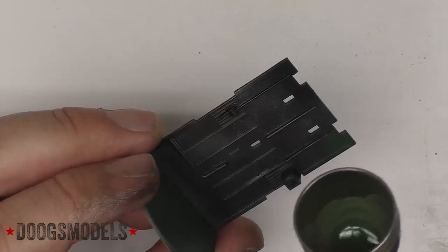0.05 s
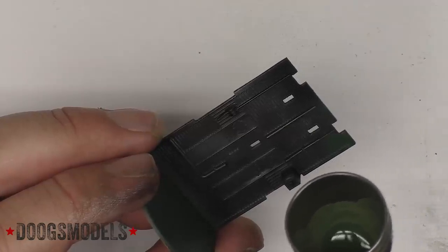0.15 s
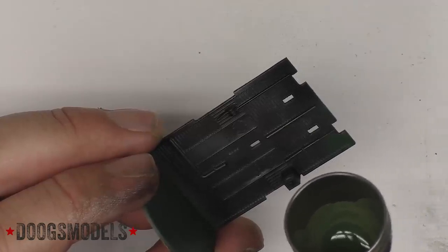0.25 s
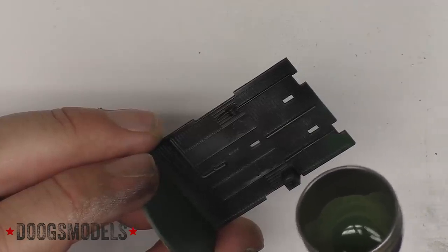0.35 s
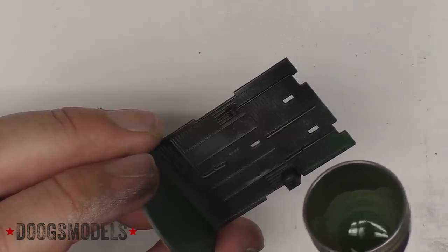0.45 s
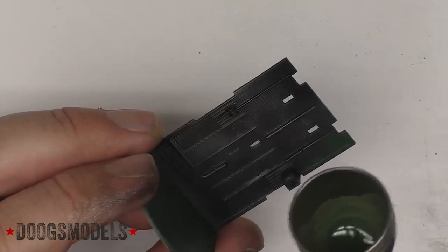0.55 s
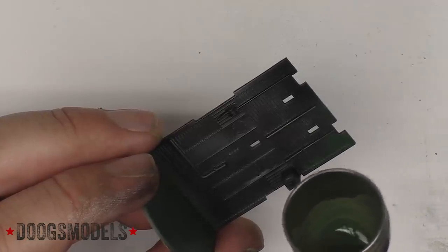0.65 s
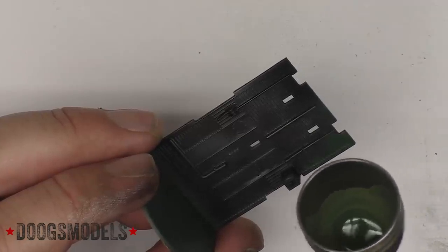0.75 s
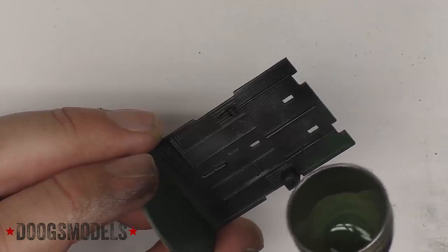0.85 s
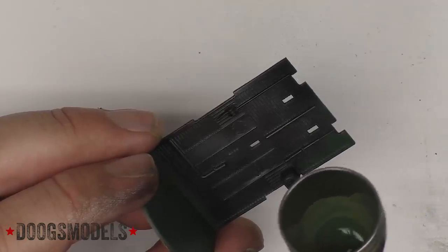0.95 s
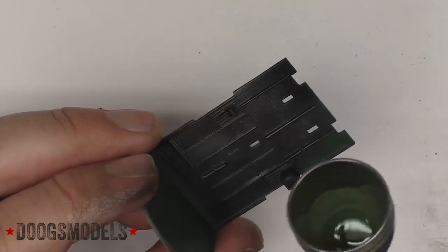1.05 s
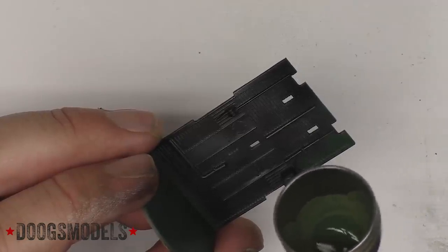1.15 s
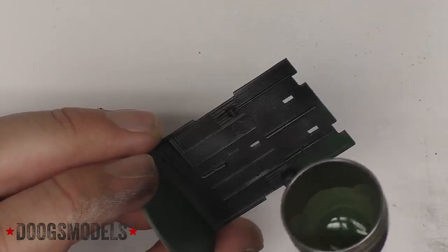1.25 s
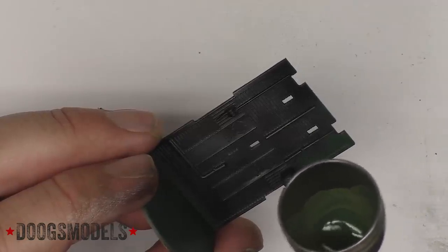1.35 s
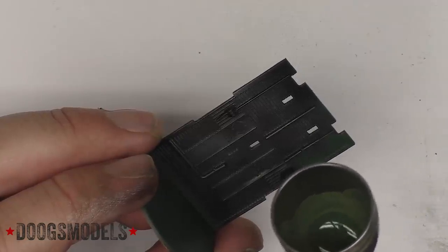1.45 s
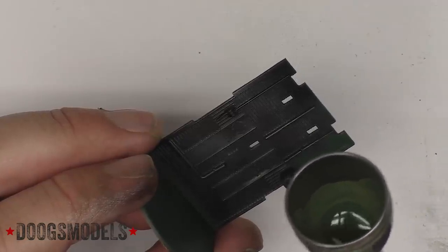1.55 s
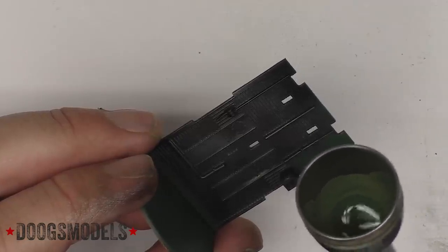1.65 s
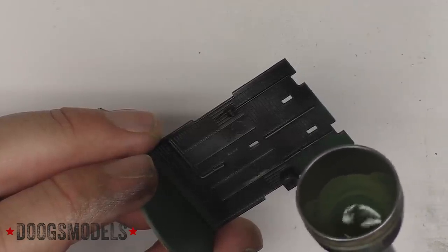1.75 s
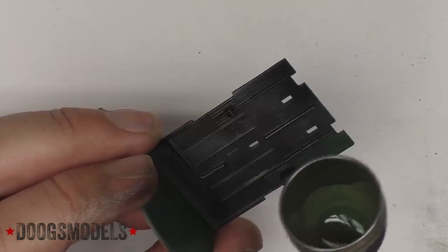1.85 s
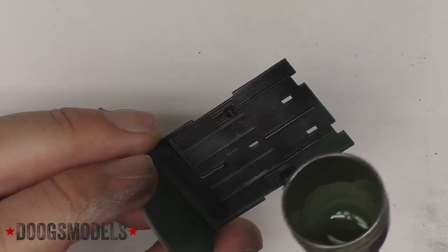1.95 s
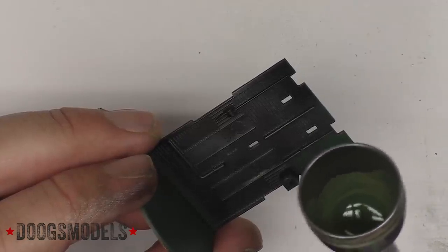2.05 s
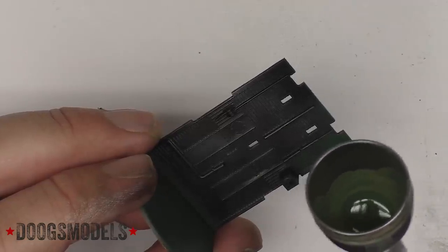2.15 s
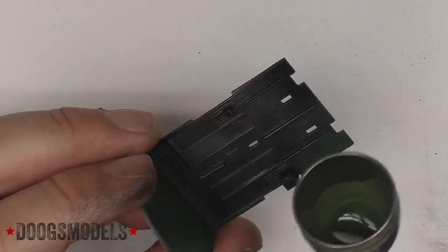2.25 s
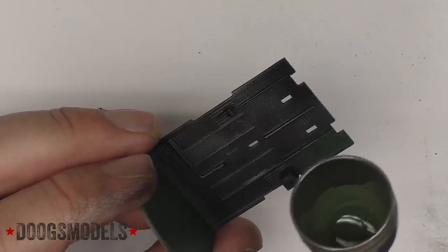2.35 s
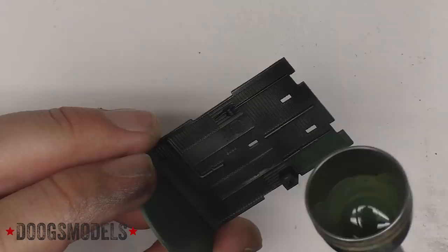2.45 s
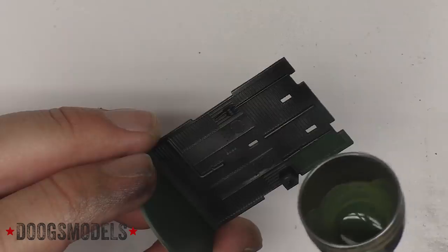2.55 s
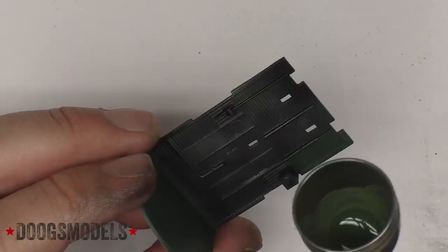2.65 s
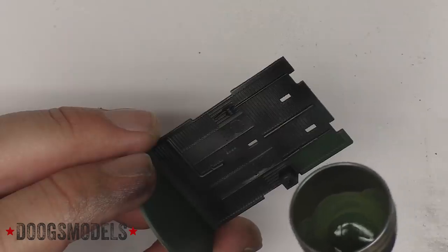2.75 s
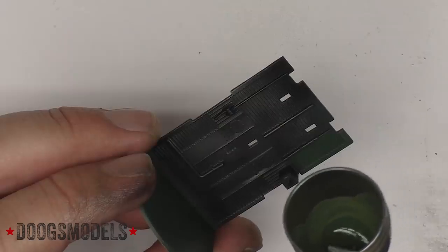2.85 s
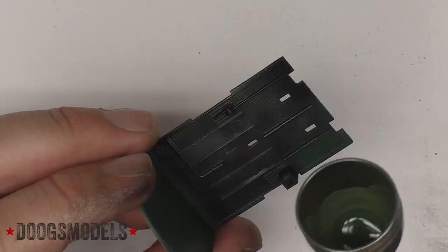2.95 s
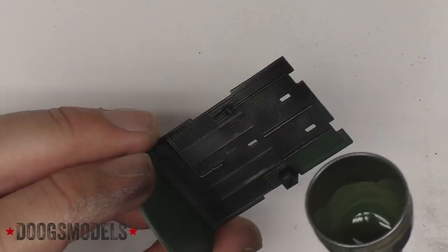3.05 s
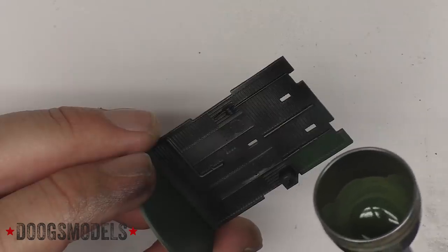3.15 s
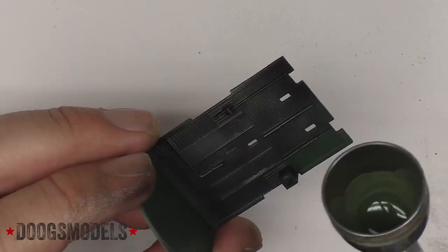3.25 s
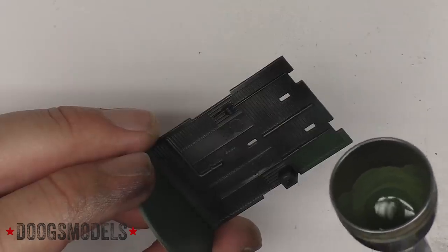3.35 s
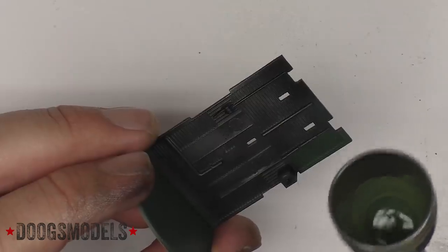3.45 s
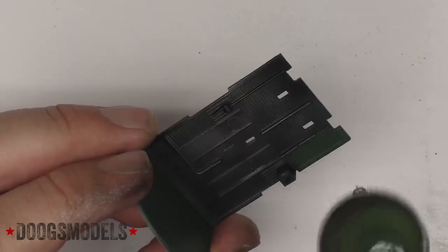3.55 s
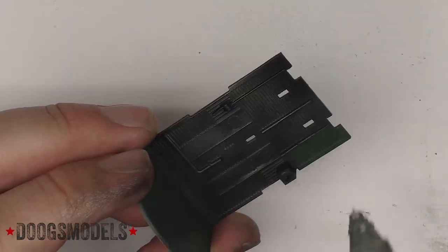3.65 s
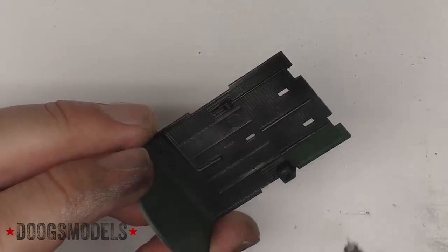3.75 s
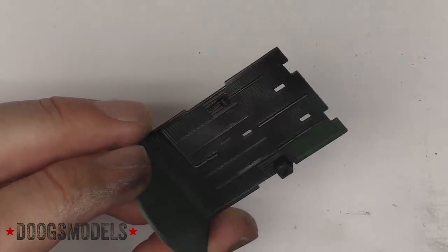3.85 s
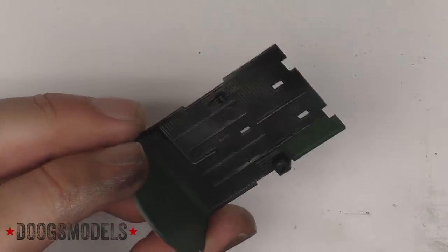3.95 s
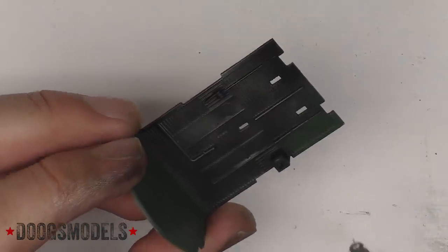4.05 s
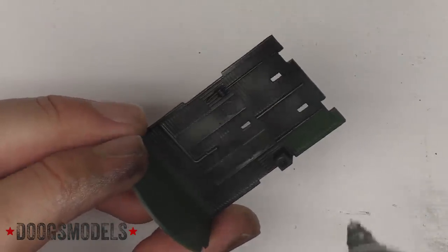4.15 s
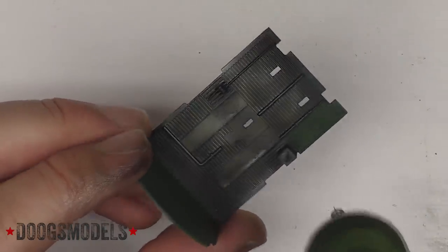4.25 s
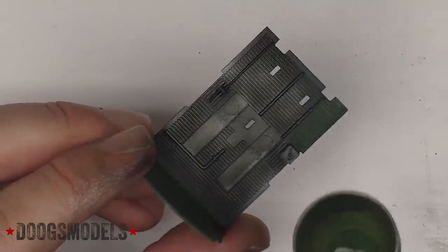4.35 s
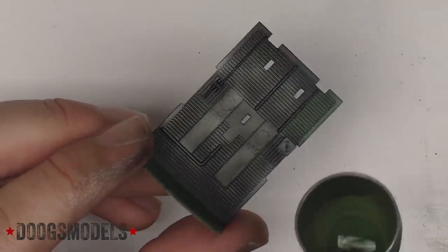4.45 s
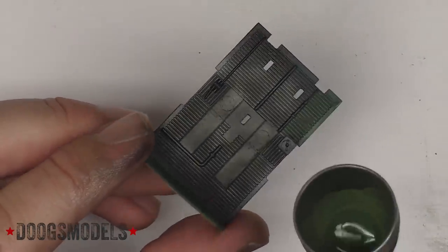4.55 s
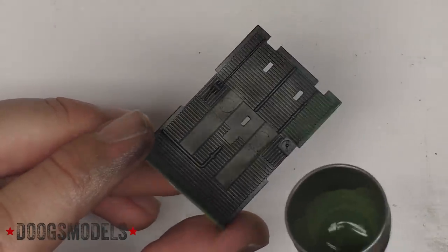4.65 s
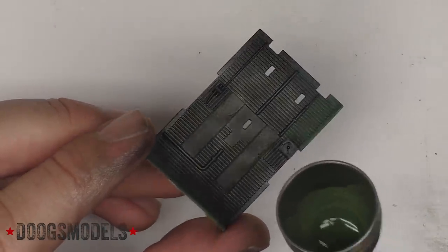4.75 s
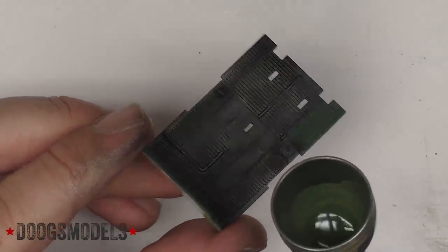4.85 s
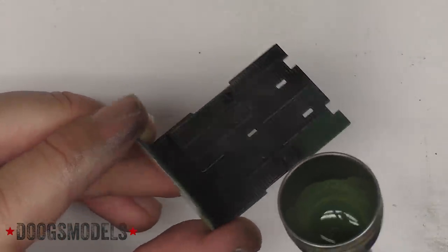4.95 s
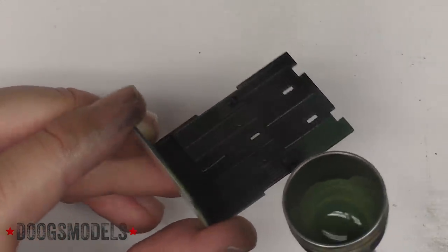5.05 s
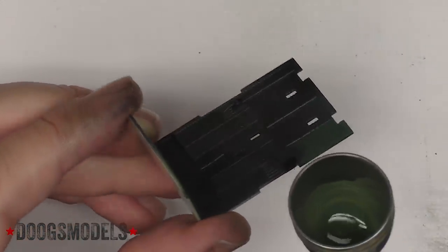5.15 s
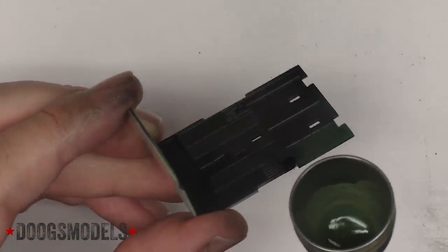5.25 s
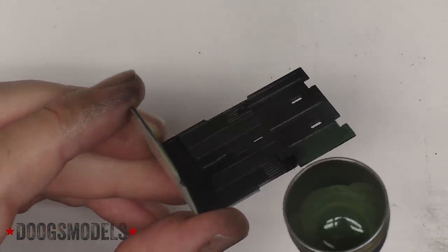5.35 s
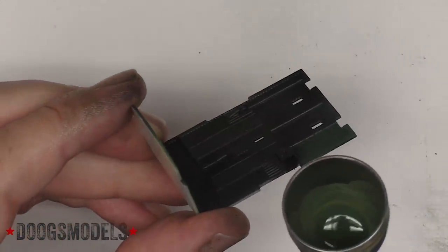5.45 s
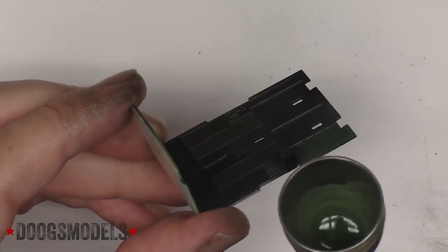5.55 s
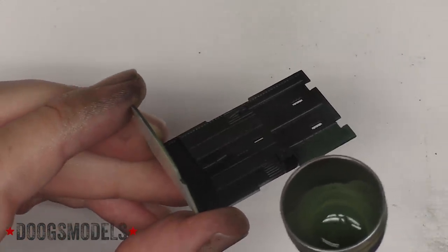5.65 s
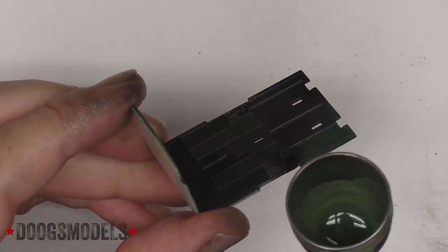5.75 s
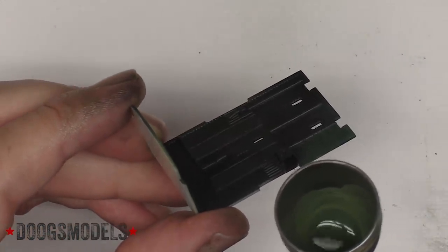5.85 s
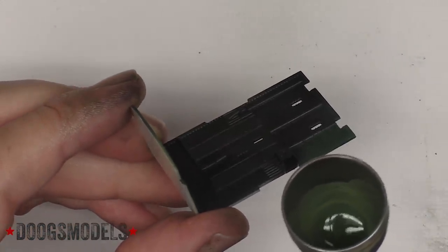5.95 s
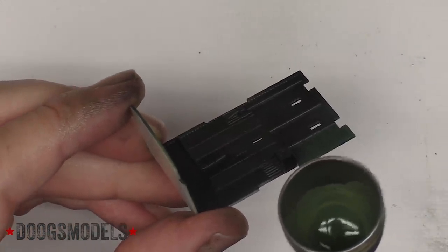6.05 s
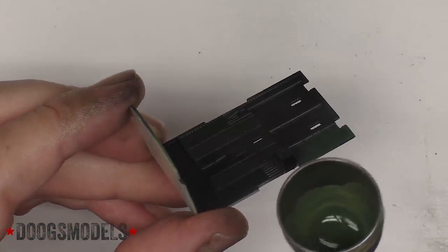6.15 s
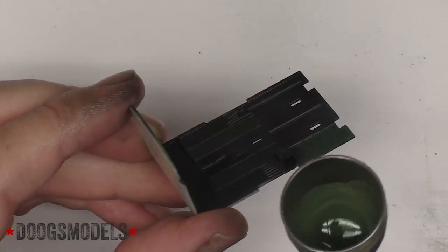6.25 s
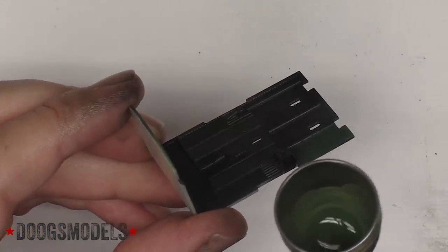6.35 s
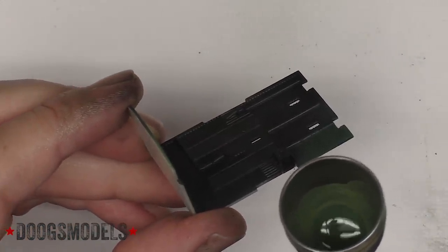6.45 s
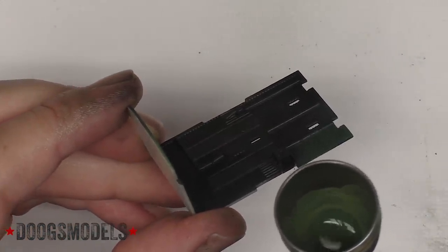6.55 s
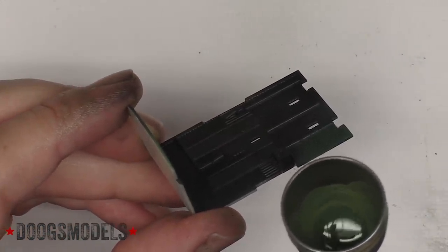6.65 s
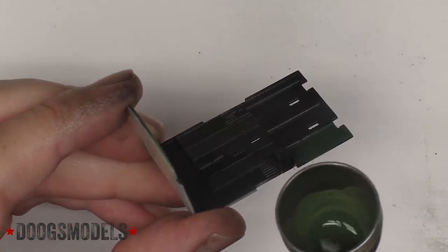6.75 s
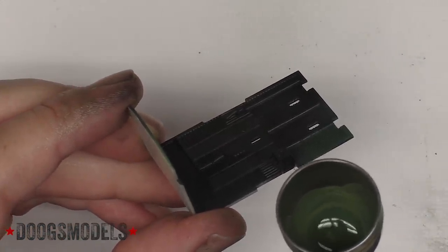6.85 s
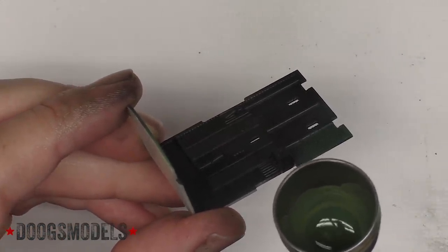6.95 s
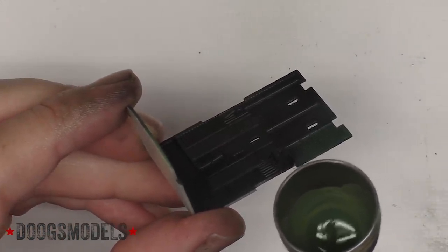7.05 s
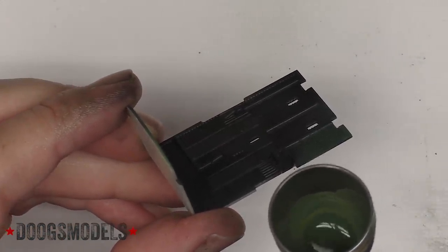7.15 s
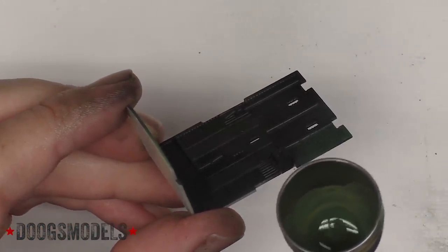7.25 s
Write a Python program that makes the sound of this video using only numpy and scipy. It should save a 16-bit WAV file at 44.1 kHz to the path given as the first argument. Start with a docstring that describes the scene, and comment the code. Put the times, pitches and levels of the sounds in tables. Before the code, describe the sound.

An airbrush hisses steadily, pauses while a small compressor faintly buzzes, gives one short puff, then sprays again.

```python
"""Airbrush on a small plastic part.

A long pass, a short test puff, then a pass on the tilted part. The jet fizzes at the nozzle, roars
where it lands and hisses on the edges; twice it spits paint. Faint squeaks and a whistle come from
the part. In the pause a small compressor buzzes over the low rumble and hum of the room."""
import sys
import numpy as np
from scipy import signal
from scipy.fft import rfft, irfft, next_fast_len
from scipy.io import wavfile
from scipy.ndimage import map_coordinates

SR = 44100
rng = np.random.default_rng(int(sys.argv[2]) if len(sys.argv) > 2 else 0)


def wav_out(sig):
    """Save sig, one row per channel (or a flat mono array), as 16-bit PCM at SR to the path in sys.argv[1]."""
    wavfile.write(sys.argv[1], SR, np.round(np.clip(np.atleast_2d(sig).T, -1, 1) * 32767).astype(np.int16))


N = 322371

# jet spectra (part flat, test puff, part tilted): f/Hz, relative level/dB
FLAT_SPECTRUM = [(400, -24), (600, -25.5), (800, -17.5), (1000, -9.5), (1400, -2), (2200, -0.5),
                 (2800, -13.5), (3500, -7.5), (4200, -10.5), (5400, -16), (7000, -13.5), (11000, -12),
                 (14000, -14), (15800, -21.5)]
TEST_SPECTRUM = [(400, -22.5), (600, -25), (800, -18), (1000, -7.5), (1400, -3.1), (2200, -0.5),
                 (2800, -3.5), (3500, -16.4), (4200, -4.5), (5400, -12.8), (7000, -15.5), (11000, -12.4),
                 (14000, -17), (15800, -20.4)]
TILTED_SPECTRUM = [(400, -35), (600, -26.9), (800, -26.6), (1000, -18.0), (1400, -5.8), (2200, -3.9),
                   (2800, -4.7), (3500, -8.9), (4200, 0.0), (5400, -5.7), (7000, -5.1), (11000, -4.1),
                   (14000, -7.4), (15800, -12.6)]
# peaks and notches of the hollows between part, fingers and paint cup: f/Hz, width/Hz, gain/dB
FLAT_HOLLOWS = [(1139, 61, -5.5), (1333, 42, -3.7), (1607, 91, -3.7), (2234, 30, -5.3), (2403, 58, 4.7),
                (2590, 30, -7.1), (2802, 62, 7.4), (3096, 35, 3.4), (3324, 30, -5.2), (3589, 62, -5.5),
                (3897, 98, 7.6), (4395, 337, 7.7), (4467, 54, -8.3), (4979, 40, 5.0), (5117, 40, -5.9),
                (5474, 56, 4.9), (5613, 34, -4.1), (5844, 42, 5.5), (6062, 69, 4.7), (6312, 69, 5.3),
                (6650, 52, -2.5), (7082, 65, 3.0), (9225, 350, 1.8), (9844, 151, -2.2), (12243, 258, -3.1),
                (14101, 317, -3.1)]
TEST_HOLLOWS = [(2574, 80, -7), (3943, 64, 4), (4127, 97, -8), (4330, 76, 3.8), (4550, 45, -8),
                (7740, 96, 7)]
TILTED_HOLLOWS = [(1383, 57, -4.8), (1704, 85, 6.3), (1794, 249, -3.3), (2353, 81, 4.9), (2538, 62, -4.2),
                  (3019, 61, 8.0), (3076, 177, -4.4), (3878, 168, 4.1), (4107, 51, -6.7), (4392, 109, 7.3),
                  (4602, 92, -5.5), (4921, 161, 2.9), (5089, 78, -6.0), (5243, 51, 3.7), (5590, 49, -7.7),
                  (5956, 152, -4.2), (6902, 61, 6.3), (7079, 113, -4.1), (7941, 250, -3.7), (8334, 76, 4.7),
                  (9369, 85, 5.5), (10737, 72, -6.5), (12233, 68, -6.5), (12805, 148, -5.0),
                  (14525, 52, 5.3), (15273, 188, -6.9)]
# trigger presses: start/s, rise/s, stop/s, fall/s, base levels of roar/dB, edge hiss/dB, fizz/dB
PRESSES = [(-0.012, .01, 3.524, .027, -45.6, -50, -48), (4.657, .0067, 4.815, .021, -42, -49, -49),
           (5.586, 0.041, 7.4, .02, -46.5, -42.5, -42.5)]
# air flow as the finger eases the trigger: t/s, relative level/dB
AIR_FLOW = [(0.1, 2.5), (0.55, -0.4), (1.35, 0.5), (1.75, 0.5), (2.45, 0.8), (3.0, 0), (3.4, 0),
            (3.5, -4.5), (4.68, -0.5), (4.81, 2.5), (5.64, 3.3), (5.95, -1), (6.12, 0), (6.48, 3.5),
            (6.58, 6.5), (6.95, 6.5), (7.07, 2.5), (7.3, 5)]
# jet sweeps onto detail or past the part: start/s, rise/s, stop/s, fall/s, roar gain/dB, edge gain/dB
SWEEPS = [(-0.11, 0.2, .31, 0.27, 8.5, 7.5), (.57, 0.085, 0.72, .08, 3.5, 1.5),
          (1.25, .35, 1.98, .12, 0.5, 1), (1.62, 0.12, 1.844, 0.092, 4, 8),
          (2.01, 0.15, 2.156, 0.12, 4, 10.5), (2.18, .09, 2.28, .016, 3.5, 6),
          (2.69, 0.24, 2.93, 0.16, 7.5, 5.5), (2.98, 0.085, 3.077, 0.37, 5.5, 5.5),
          (3.1, .35, 3.53, .04, -.5, 5.5), (4.69, .09, 4.82, .03, -1, 3),
          (5.875, 0.024, 5.915, 0.034, 2.5, 3.5), (6.055, .03, 6.105, .025, -2, -2),
          (6.69, 0.036, 6.63, .04, 4, 2.5), (6.81, .03, 6.8, 0.026, 3, 1.5), (7.14, .07, 7.2, .06, 6, 5)]
# room rumble and hiss: f/Hz, relative level/dB
RUMBLE_SPECTRUM = [(15, -23), (25, -16), (45, -5), (60, -2), (75, -4.5), (102, 1), (140, -1), (200, -0.5),
                   (270, -1), (340, -4), (450, -5.5), (620, -21), (850, -23), (1400, -90)]
HISS_SPECTRUM = [(350, -45), (600, -21), (811, -6.5), (1270, -0.5), (1380, 0), (1790, -2.5), (2630, -3.5),
                 (4310, -10.5), (5430, -15.5), (6580, -16.5), (7140, -19.5), (9140, -13), (15800, -9)]
# diffuse sound: f/Hz, left-right correlation
COHERENCE = [(40, 0.22), (90, 0.39), (200, 0.22), (500, 0.2), (800, .5), (1300, 0.26), (2000, 0.55),
             (3000, 0.33), (5500, 0.36), (7300, 1), (9500, .65), (14000, .25)]
# finger squeaks and edge whistles: start/s, stop/s, first f/Hz, last f/Hz, width/Hz, level/dB
WHISTLES = [(3.9, 3.93, 1550, 1550, 150, -71), (5.236, 5.3, 3770, 3680, 30, -62),
            (5.262, 5.287, 1077, 1060, 66.8, -61), (7.169, 7.256, 4270, 4860, 401, -40)]
# compressor resonances: f/Hz, width/Hz, relative level/dB
CASING_MODES = [(1980, 19, 0.5), (1898, 15, -12), (701.5, 20, -19.5), (810, 12, -27)]
COVER_MODES = [(2110, 70, 3), (2190, 80, -5.5)]
# compressor intake: f/Hz, relative level/dB
RUSH_SPECTRUM = [(50, -4), (100, 9), (160, -8), (270, 7.5), (430, -14), (620, -18), (860, -12.5),
                 (1060, 0.5), (1500, -9), (1900, -2), (2800, -12), (3800, -11.5), (6000, -27), (10000, -47)]
# paint spits: t/s, level/dB, t60/s
SPITS = [(4.6612, -31.5, 0.06), (7.215, -32, .006)]
# spit noise: f/Hz, relative level/dB
SPIT_SPECTRUM = [(400, -19), (1000, -10.5), (2000, 1.5), (5500, -3), (11000, -11), (15000, -28)]
# room decay: f/Hz, t60/s
ROOM_DECAY = [(300, 0.58), (2000, 0.35), (5000, 0.43), (14000, 0.3)]
# stereo width of the tail: f/Hz, side gain/dB
TAIL_WIDTH = [(700, 5), (1300, -3.5), (2000, -17), (2700, 1.5), (3300, 5), (4000, -8.5), (5150, 4.5),
              (6300, -46), (9000, -20), (10500, 1.5), (12200, 2), (15500, 3)]
# direct sound balance: f/Hz, left boost and right cut/dB
LEAN = [(1500, 0.037), (4400, 0.18), (8000, 0.0), (15000, 0.76)]

MOTOR_HZ, TOP_HZ = 59.06, 15780
# compressor gates: start/s, rise/s, stop/s, fall/s
MOTOR_RUN = (4.14, .013, 5.6, .1)
RUSH_SWELL = (4.17, 0.52, 5.28, .27)
RATTLE_SWELL = (4.3, .9, 5.34, .25)


def amp(db):
    """Decibels to gain."""
    return 10 ** (np.asarray(db) / 20)


def unit(x):
    """Scale to rms 1."""
    return x / np.sqrt(np.mean(x ** 2) + 1e-20)


def time_s():
    """Sample times."""
    return np.arange(N) / SR


def along(points, hz):
    """Interpolate (f/Hz, value) points on a log axis."""
    f, values = np.transpose(points)
    return np.interp(np.log(hz + 1), np.log(f + 1), values)


def wobble(rate_hz):
    """Smooth curve through random knots."""
    return map_coordinates(rng.standard_normal(int(N * rate_hz / SR) + 4), [time_s() * rate_hz])


def filtered(x, response):
    """Apply a frequency response."""
    size = next_fast_len(N + SR // 2)
    return irfft(rfft(x, size) * response(np.fft.rfftfreq(size, 1 / SR)), size)[..., :N]


def gate(start_s, rise_s, stop_s, fall_s):
    """Smooth 0..1 window; the fall begins at stop_s."""
    ramp = np.minimum((time_s() - start_s) / rise_s, (stop_s - time_s()) / fall_s + 1)
    return np.sin(np.pi / 2 * np.clip(ramp, 0, 1)) ** 2


def diffuse(spectrum):
    """Stereo noise from all round, rms 1."""
    def mid_side_gains(hz):
        angle = np.arccos(np.clip(along(COHERENCE, hz), -1, 1)) / 2
        return amp(along(spectrum, hz)) * [np.cos(angle), np.sin(angle)]

    mid, side = filtered(rng.standard_normal((2, N)), mid_side_gains)
    return unit(np.array([mid + side, mid - side]))


def flow_db():
    """Air flow set by the trigger, per sample."""
    return np.interp(time_s(), *np.transpose(AIR_FLOW))


def turbulence(spectrum, hollows, scatter_db, scatter_s=0.0047):
    """Jet noise, coloured by hollows round the part and combed by reflections off the bench clutter."""
    def colour(hz):
        hollows_db = sum(db * np.exp(-((hz - f) / width) ** 2) for f, width, db in hollows)
        return amp(along(spectrum, hz) + hollows_db)

    t = np.arange(SR // 40) / SR
    paths = rng.standard_normal(len(t)) * t * np.exp(-t / scatter_s)
    paths *= amp(scatter_db) / np.linalg.norm(paths)
    paths[0] = 1  # direct path
    noise = signal.fftconvolve(rng.standard_normal(N), paths)[:N]
    return filtered(noise, colour)


def spray(press, noise, edge_hz=2800, fizz_hz=7500, flutter_hz=28):
    """Big eddies roar on the surface, smaller ones hiss on the edges, the finest fizz at the nozzle."""
    def bands(hz):
        below_edge, below_fizz = (1 / (1 + (hz / corner) ** 16) for corner in (edge_hz, fizz_hz))
        return np.array([below_edge, below_fizz - below_edge, 1 - below_fizz])

    roar_db, edge_db, fizz_db = press[4:]
    roar, edge, fizz = map(unit, filtered(noise, bands))
    roar_sweep_db, edge_sweep_db = sum(np.outer(sweep[4:], gate(*sweep[:4])) for sweep in SWEEPS)
    flutter = wobble(flutter_hz)  # jet wanders over raised detail
    roar *= amp(roar_db + roar_sweep_db + 0.67 * flutter)
    edge *= amp(edge_db + edge_sweep_db + 0.54 * flow_db() + 0.57 * flutter)
    fizz *= amp(fizz_db + flow_db() + 0.36 * edge_sweep_db)
    return gate(*press[:4]) * (roar + edge + fizz)


def airbrush(linger_db=-70.5, linger_hold_s=0.34, linger_fall_s=.22):
    """Three trigger presses release the jet; a faint air hiss outlasts the first."""
    flat = turbulence(FLAT_SPECTRUM, FLAT_HOLLOWS, scatter_db=-13.5)
    test = turbulence(TEST_SPECTRUM, TEST_HOLLOWS, scatter_db=-11.5)
    tilted = turbulence(TILTED_SPECTRUM, TILTED_HOLLOWS, scatter_db=-11)
    passes = sum(spray(press, noise) for press, noise in zip(PRESSES, (flat, test, tilted)))
    stop_s, fall_s = PRESSES[0][2:4]
    linger = gate(stop_s - fall_s, fall_s, stop_s + linger_hold_s, linger_fall_s)
    return passes + amp(linger_db) * linger * unit(flat)


def background(rumble_db=-65, blowing_db=5.0, hum_db=-71, hiss_db=-64.5):
    """Room rumble that grows while air blows, motor hum and a thin steady hiss."""
    blowing = sum(gate(*press[:4]) for press in PRESSES)
    swell_db = blowing * (blowing_db + 0.36 * flow_db())
    hum = amp(hum_db + 1.6 * wobble(rate_hz=3.05)) * np.sin(2 * np.pi * 2 * MOTOR_HZ * time_s())
    rumble = amp(rumble_db + swell_db) * diffuse(RUMBLE_SPECTRUM)
    hiss = amp(hiss_db) * diffuse(HISS_SPECTRUM)
    lean_right = amp([[-.5], [.5]])
    return (rumble + hum) * lean_right + hiss


def whistles(rise_s=0.023, fall_s=.025):
    """The part squeaks in the fingers, the jet whistles on a sharp edge: narrow gliding noise bands."""
    out = np.zeros(N)
    for start_s, stop_s, first_hz, last_hz, width_hz, db in WHISTLES:
        pitch_hz = np.interp(time_s(), [start_s, stop_s], [first_hz, last_hz])
        phase = 2 * np.pi * np.cumsum(pitch_hz) / SR
        band = wobble(2 * width_hz) * np.cos(phase) + wobble(2 * width_hz) * np.sin(phase)
        out += amp(db) * gate(start_s, rise_s, stop_s, fall_s) * unit(band)
    return out


def ring(strokes, modes, roughness):
    """Strokes plus noise drive a set of resonances; rms 1."""
    def response(hz):
        return sum(amp(db) * 1j * hz * width / (f * f - hz * hz + 1j * hz * width)
                   for f, width, db in modes)

    return unit(filtered(strokes + roughness * rng.standard_normal(N), response))


def compressor(buzz_db=-68, rattle_db=-80, rattle_swell_db=12.5, rush_db=-73, rush_swell_db=14.5):
    """Piston strokes ring the casing and rattle the cover; intake air rushes."""
    turns = time_s() * MOTOR_HZ
    strokes = unit(sum(np.cos(2 * np.pi * harmonic * turns) for harmonic in range(8, 48)))
    buzz = amp(buzz_db) * ring(strokes, CASING_MODES, roughness=.6)
    rattle_gain = amp(rattle_db + rattle_swell_db * gate(*RATTLE_SWELL))
    rattle = rattle_gain * ring(strokes, COVER_MODES, roughness=3)
    rush = amp(rush_db + rush_swell_db * gate(*RUSH_SWELL)) * diffuse(RUSH_SPECTRUM)
    return gate(*MOTOR_RUN) * (buzz + rattle + rush)


def spits():
    """Paint gathered on the needle blows off in sharp bursts."""
    noise = unit(filtered(rng.standard_normal(N), lambda hz: amp(along(SPIT_SPECTRUM, hz))))
    t = time_s()
    envelope = sum((t >= at_s) * amp(db - 60 * np.abs(t - at_s) / t60_s) for at_s, db, t60_s in SPITS)
    return envelope * noise


def room(source):
    """Room reflections: a short stereo tail."""
    hz, t, noise = signal.stft(rng.standard_normal((2, SR // 2)), SR, nperseg=256)
    decay = amp(-60 * t / along(ROOM_DECAY, hz)[:, None])
    tail = signal.istft(noise * decay, SR, nperseg=256)[1]
    tail /= np.linalg.norm(tail)
    mid, side = signal.fftconvolve(source[None], tail, axes=1)[:, :N]
    side = filtered(side, lambda hz: amp(along(TAIL_WIDTH, hz)))
    return np.array([mid + side, mid - side])


def scene(room_db=-11):
    """Bench sources near centre, treble slightly left, plus room tail and background."""
    near = airbrush() + spits() + compressor() + whistles()
    direct = filtered(near, lambda hz: amp(np.outer([1, -1], along(LEAN, hz))))
    return direct + amp(room_db) * room(near.mean(axis=0)) + background()


def record(dry):
    """Brick-wall low-pass at TOP_HZ."""
    return filtered(dry, lambda hz: hz < TOP_HZ)


dry = scene()
out = record(dry)
wav_out(out)
```